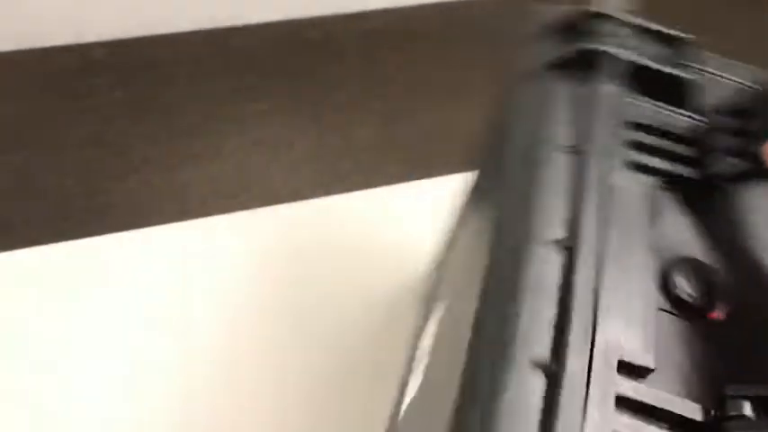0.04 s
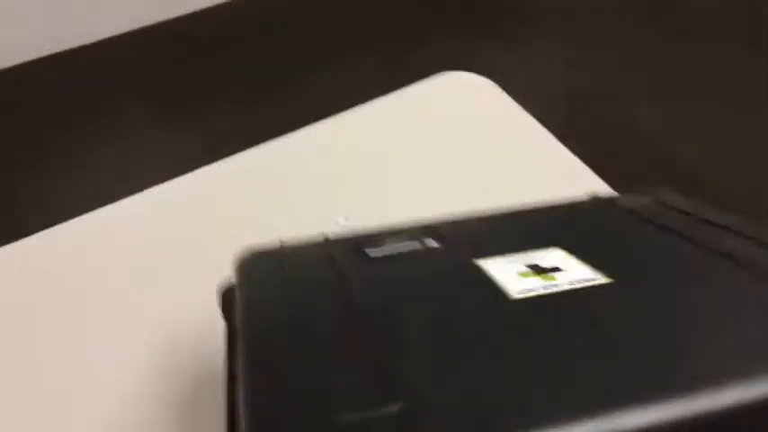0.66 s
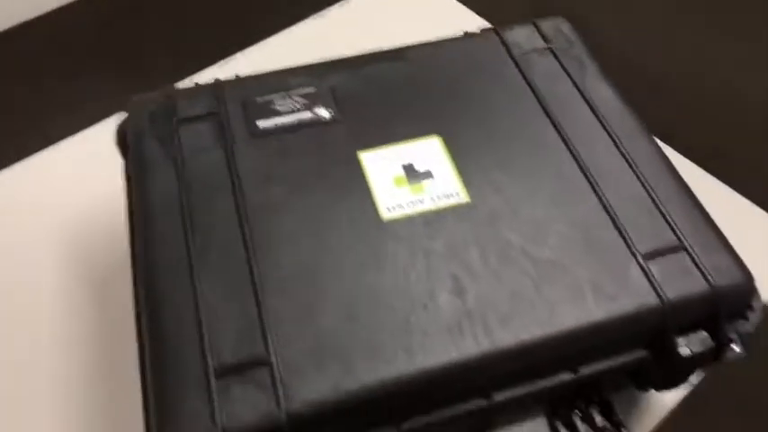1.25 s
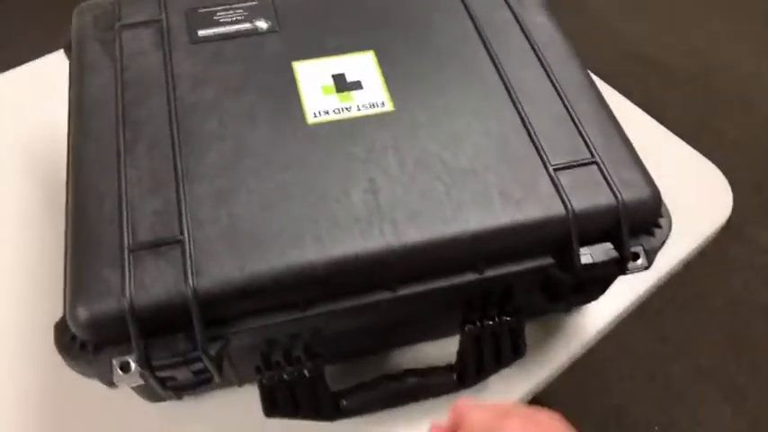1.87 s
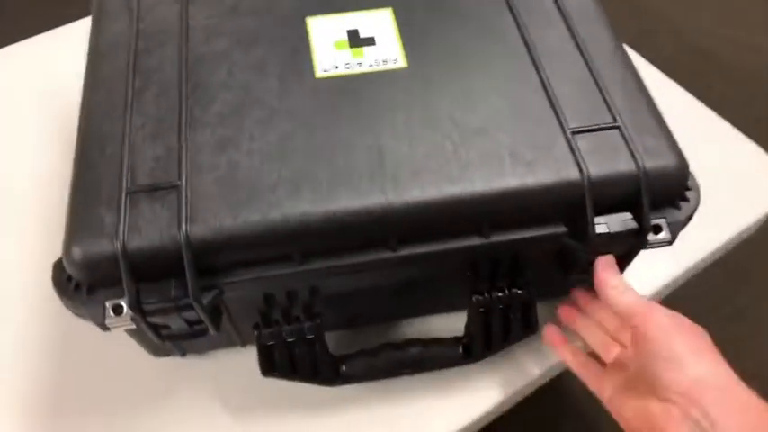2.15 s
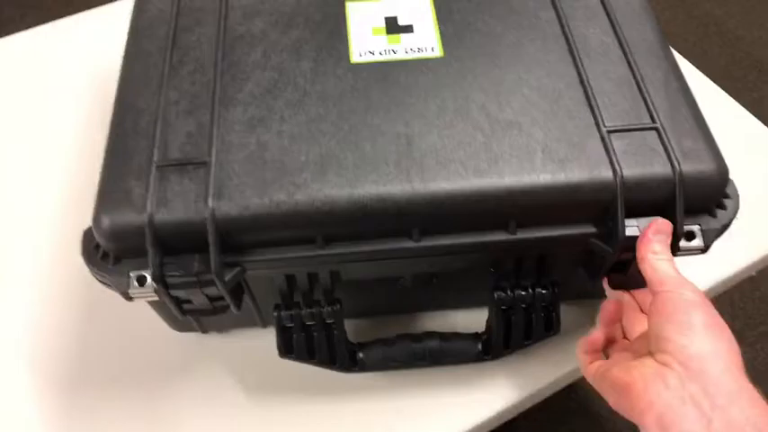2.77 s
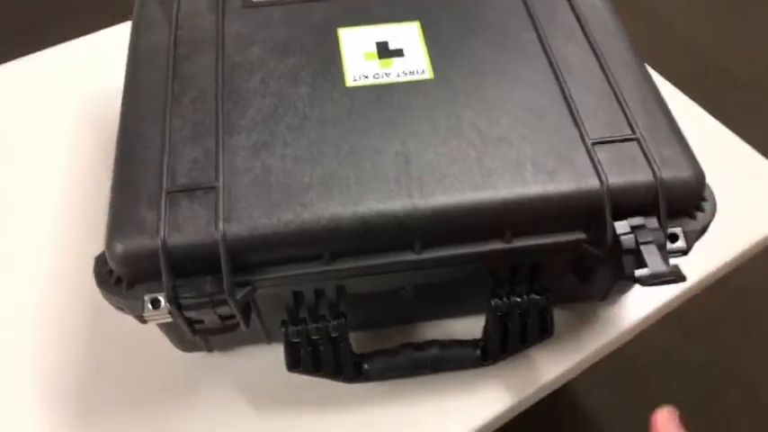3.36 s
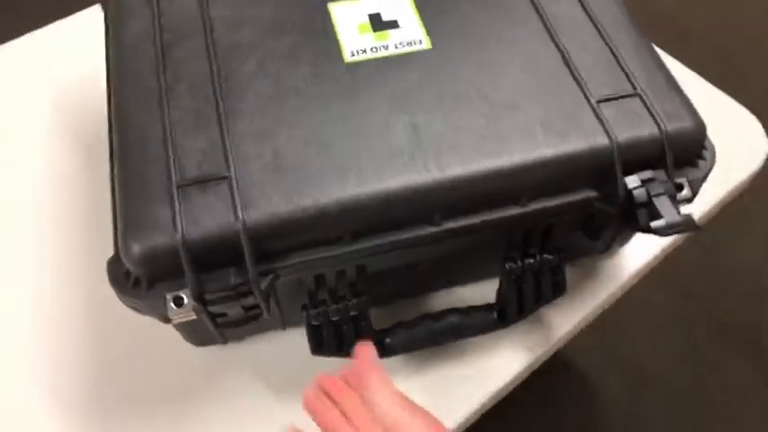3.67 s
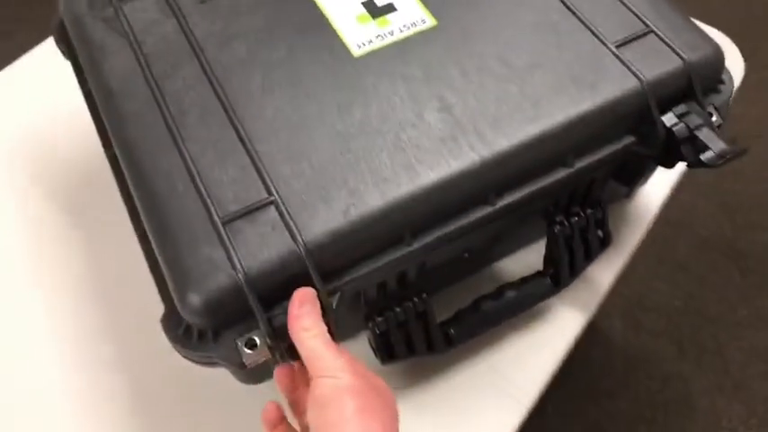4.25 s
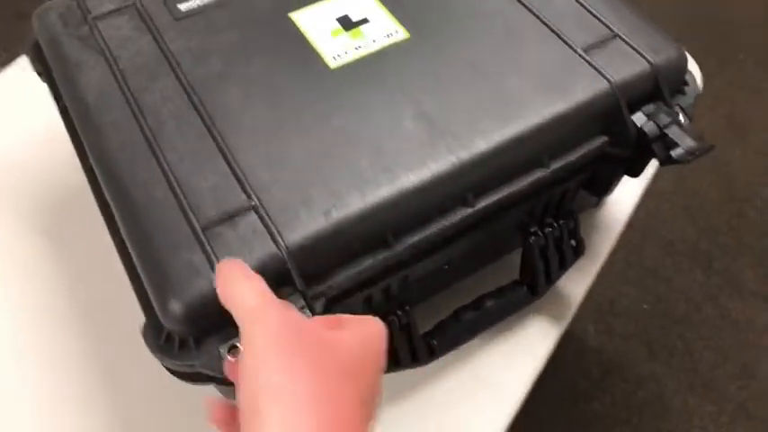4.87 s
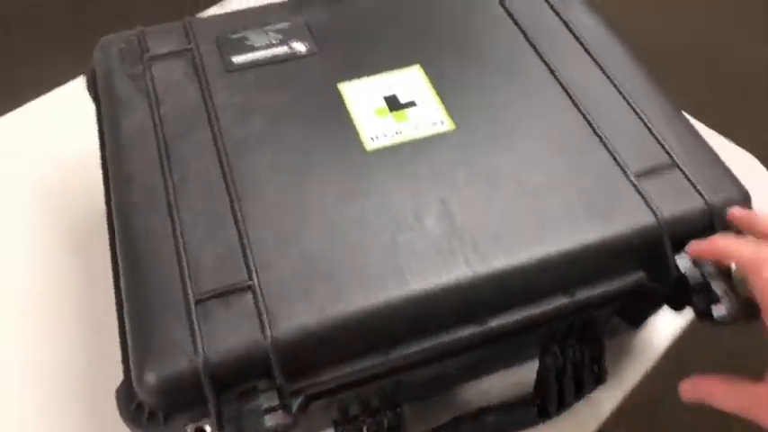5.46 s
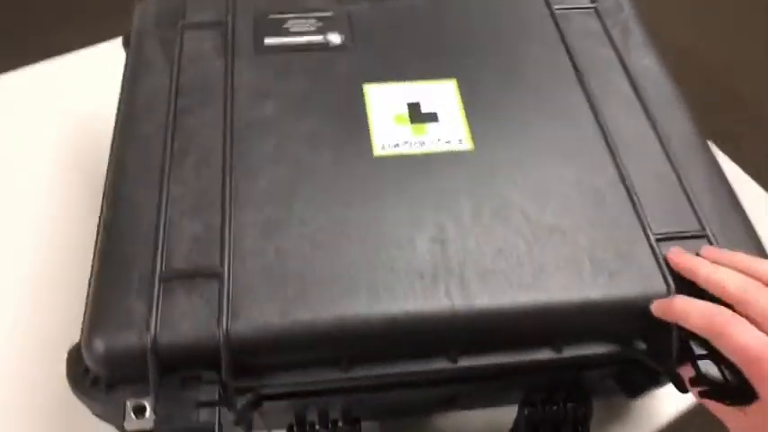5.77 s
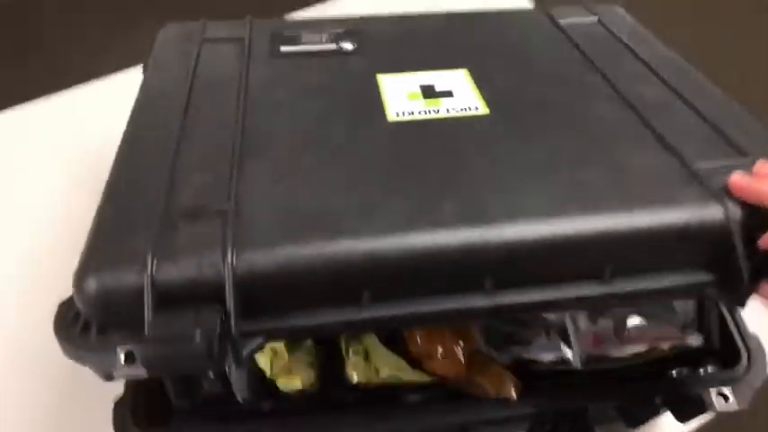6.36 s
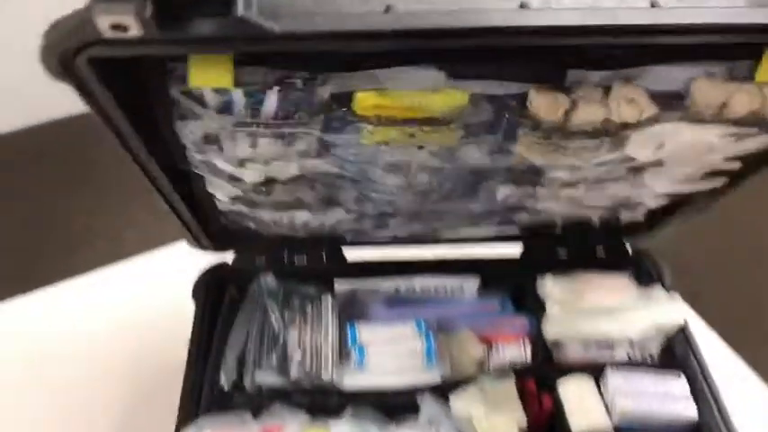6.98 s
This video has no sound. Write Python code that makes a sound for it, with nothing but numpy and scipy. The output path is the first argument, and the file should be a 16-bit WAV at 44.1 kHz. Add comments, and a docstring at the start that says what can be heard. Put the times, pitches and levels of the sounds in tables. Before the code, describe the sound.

A hard plastic case scrapes round on a table and thumps flat, then two latches snap open and the lid lifts.

```python
"""Plastic case, dragged and unlatched

A hard case scrapes round on a table and drops flat; two latches are prised open and the lid lifts.
Each blow is a short crack that rings the struck part and, if heavy, the hollow shell. Stick-slip grains
make the scraping and packets rustle inside. Heard at arm's reach in a carpeted room with humming vents."""
import sys
import numpy as np
from scipy import signal
from scipy.fft import rfft, irfft
from scipy.io import wavfile
from scipy.ndimage import uniform_filter1d

SR = 44100
rng = np.random.default_rng(int(sys.argv[2]) if len(sys.argv) > 2 else 0)


def unload_wav(signal):
    """Save mono or channel-first audio to the path in sys.argv[1] as 16-bit WAV at rate SR, clipped to [-1, 1]."""
    wavfile.write(
        sys.argv[1],
        SR,
        np.round(np.clip(np.atleast_2d(signal).T, -1, 1) * 32767).astype(np.int16),
    )


N = 309582
T = np.arange(N) / SR
BLOW_T = T[:SR // 8]  # time axis of one short hit
TEN_MS = np.sqrt(SR / 100)  # gives a unit-energy hit the energy of 10 ms at rms 1
TOP_HZ = 15400


def undb(db):
    """Decibels to gain."""
    return 10 ** (np.asarray(db) / 20)


def unit(x):
    """Scale to an energy of 1."""
    return x / np.sqrt(np.sum(x ** 2) + 1e-18)


def steady(x):
    """Scale to an rms of 1."""
    return x / np.std(x)


def fader(rows):
    """Gain along a (time, dB) curve, silent outside it."""
    times, levels_db = np.transpose(rows)
    return undb(np.interp(T, times, levels_db, left=-200, right=-200))


def on_log(hz, rows, column=1):
    """Read a column of a table on a log-frequency axis."""
    rows = np.array(rows)
    return np.interp(np.log(np.maximum(hz, 1)), np.log(rows[:, 0]), rows[:, column])


def colour(x, eq):
    """Shape a full-length sound with an EQ curve; rms 1."""
    gain = undb(on_log(np.fft.rfftfreq(N, 1 / SR), eq))
    return steady(irfft(rfft(x) * gain, N))


def band(x, lo, hi, order=2):
    """Causal band-pass."""
    return signal.sosfilt(signal.butter(order, [lo, min(hi, .47 * SR)], "band", fs=SR, output="sos"), x)


def fade(t, t60):
    """Exponential decay, 60 dB down at t60."""
    return np.exp(-np.log(1000) * t / t60)


def ring(modes, t):
    """Damped (Hz, dB, t60) modes, balanced by energy, each in a random polarity."""
    return unit(sum(rng.choice([-1, 1]) * undb(db) * unit(np.sin(2 * np.pi * hz * t) * fade(t, t60))
                    for hz, db, t60 in modes))


def add(out, s, x):
    """Mix x into out from time s."""
    i = max(int(s * SR), 0)
    out[i:i + len(x)] += x[:N - i]


def grains(rate, spread_db):
    """Stick-slip: tiny slips at random moments; a positive spread makes a few stand out."""
    size = undb(spread_db * np.minimum(rng.exponential(size=N), 4))
    slipping = rng.random(N) < rate / SR
    return steady(slipping * rng.choice([-1, 1], N) * size)


def wander(rate):
    """A control signal gliding to a new random value `rate` times a second; rms 1."""
    hold = int(SR / rate)
    steps = np.repeat(rng.standard_normal(N // hold + 1), hold)
    return steady(uniform_filter1d(steps, hold)[:N])


def crack(t60, rise):
    """A burst of micro-contacts, even across frequency; rise is the attack as a share of t60."""
    envelope = fade(BLOW_T, t60) * (1 - np.exp(-BLOW_T / (rise * t60)))
    burst = rng.standard_normal(len(BLOW_T)) * envelope
    for _ in range(3):  # flatten the spectrum while keeping the burst short
        spectrum = rfft(burst)
        contour = np.sqrt(np.abs(uniform_filter1d(np.abs(spectrum) ** 2, size=30)) + 1e-18)
        burst = irfft(spectrum / contour, len(BLOW_T)) * envelope ** .1
    return unit(burst)


# Room tone EQ: (frequency [Hz], level [dB])
AIR_EQ = [(15, -50), (25, -20.5), (66, 0.5), (86, -10.5), (99, -15), (136, -5.5), (331, -18), (567, -21.5),
          (762, -21.5), (919, -22), (1300, -27.5), (2230, -26), (2850, -34), (4150, -35.5), (15500, -44.5)]
# Room tone fader ride: (time [s], level [dB])
AIR_RIDE = [(0, -47), (1.7, -50.5), (2.15, -51.5), (2.62, -49), (2.8, -58.5), (3.25, -47.5), (3.53, -55),
            (4.1, -52), (5.05, -50), (5.3, -57.5), (5.6, -50), (7.02, -54.5)]


def ventilation():
    """Soft air noise over a wavering low drone that swells once."""
    air = colour(rng.standard_normal(N), AIR_EQ) * undb(0.16 * wander(16))
    drone = steady(band(rng.standard_normal(N), 67.6, 76))
    swell_db = 12 * np.exp(-((T - 5.69) / 0.38) ** 2)
    return fader(AIR_RIDE) * air + undb(-59 + swell_db) * drone


# Sliding speed of the case, as a fader ride: (time [s], relative level [dB])
DRAG_RIDE = [(0.0, -24.5), (0.056, -22.5), (0.132, -29), (0.168, -22), (0.534, -30.5), (0.646, -28.5),
             (0.686, -23), (0.712, -23.5), (0.726, -17.5), (0.902, -28.5), (0.924, -31.5), (0.94, -34.5),
             (1.04, -33)]
# EQs of the low, mid and high drag layers: (frequency [Hz], level [dB])
RUMBLE_EQ = [(20, -48), (38, -25.5), (58, 0), (85, -14), (130, 4), (175, -2.5), (240, -12), (400, -69)]
JUDDER_EQ = [(130, -40.5), (220, 0), (280, 2), (340, 2), (430, -14), (600, -12), (1200, -65)]
SCRAPE_EQ = [(240, -32), (400, 0), (558, -6.5), (804, -2.5), (880, -4.5), (1450, -10), (2320, -19.5),
             (3240, -14.5), (3890, -28.5), (4390, -25.5), (7470, -43.5), (8960, -38), (15000, -72.5)]


def dragging():
    """Feet slip over the table: slow slips rumble the shell, faster ones judder walls, fine ones scrape."""
    speed = fader(DRAG_RIDE) / fader(DRAG_RIDE).max()
    on_edge = np.interp(T, [0.42, 0.52], [1, 0])  # tipped on its edge, the case scrapes harder
    rumble = colour(grains(rate=500, spread_db=0.5), RUMBLE_EQ) * speed
    judder = colour(grains(rate=300, spread_db=1.5), JUDDER_EQ) * speed ** 1.33
    scrape = colour(grains(rate=2300, spread_db=-2 / 2), SCRAPE_EQ) * speed ** 1.4
    return undb(-20.5) * rumble + undb(-22.5) * judder + undb(-29 + 4.5 * on_edge) * scrape


# The struck part bends like a short bar. Its partials: (multiple of the ring pitch [ratio])
BAR_RATIOS = [1, 2.756, 5.404]
# Voicing of those partials: (level [dB], share of the ring time [ratio])
BAR_VOICING = [(8.5, 1), (-9.5, 0.56), (-9, 0.81)]
# Ring of the stiff latch and rim: (frequency [Hz], level [dB], t60 [s])
RIM_MODES = [(1220, -4.5, 0.032), (1474, 1.5, 0.0089), (1933, -4.5, 0.018), (2670, -11, 0.0058),
             (2990, -4.5, 0.011), (3440, -6, 0.01), (5900, -7, .011), (7000, -11.5, 0.0042)]


def blow(knock_db, clack_db, snap_db, ring_hz, ring_db, ring_t60, t60, rise, rim_db, soft_hz, hard_hz):
    """A crack rings the struck part and the rim, mixed as low knock, mid clack and high snap."""
    force = crack(t60, rise)
    attack = 1 - np.exp(-BLOW_T / (rise * t60))
    bar = [(ring_hz * ratio, db, ring_t60 * share)
           for ratio, (db, share) in zip(BAR_RATIOS, BAR_VOICING) if ring_hz * ratio < TOP_HZ]
    part = undb(ring_db) * ring(bar, BLOW_T) * attack
    rim = undb(rim_db) * ring(RIM_MODES, BLOW_T) * attack
    soft = unit(band(force, 390, soft_hz, order=1)) + part + rim  # plastic gives, rounding the treble
    hard = unit(band(force, 2000, hard_hz, order=1)) + undb(-1.5) * part + rim
    knock = undb(knock_db) * unit(band(soft, 430, 900, order=3))
    clack = undb(clack_db) * unit(band(soft, 900, 4800, order=3))
    snap = undb(snap_db) * unit(band(hard, 4800, 18000, order=3))
    return (knock + clack + snap) * TEN_MS


# Boom of the hollow shell on the table: (frequency [Hz], level [dB], t60 [s])
SHELL_MODES = [(63, -4.5, 0.51), (76.5, -5, 0.46), (105, -7, .4), (115.6, -2, 0.44), (131, 0, 0.5),
               (167, 2, 0.69), (203.2, 1, 0.2), (234, -2.5, 0.073), (285.2, 1, .15), (315.4, -0.5, 0.18),
               (360, -7.5, 0.089), (416.2, -2, 0.5), (493, -8.5, 0.049), (530, -3.5, 0.085),
               (588, 1.5, 0.14), (633, -1.5, 0.11), (705, -3.5, 0.075), (775, -4.5, 0.072),
               (957, -6.5, 0.15)]


def heavy_blows(rows, ring_cycles, flex_hz, flex_cycles, flex_lag_s, boom_db, hollow_db, rim_db,
                rise, soft_hz, hard_hz):
    """Blows hard enough to flex the walls and set the hollow shell booming."""
    out = np.zeros(N)
    for s, clack, knock, thump, snap, hz, ring_db, *_ in rows:
        t60 = ring_cycles / hz
        weight_db = thump - clack  # a weightier blow rings the rim less and flexes the walls more slowly
        thump_hz = flex_hz * 2 ** (-weight_db / 15)
        add(out, s, blow(knock, clack, snap, hz, ring_db, t60, t60, rise,
                         rim_db - 1.3 * weight_db, soft_hz, hard_hz))
        flex = ring([(thump_hz, 0, flex_cycles / thump_hz)], BLOW_T)
        add(out, s + flex_lag_s, undb(thump) * unit(band(flex, thump_hz / 2, 400)) * TEN_MS)
        # shell modes near the flexing rate take most of the push
        low_modes = [(f, db - 1.9 * abs(np.log2(f / thump_hz)), decay)
                     for f, db, decay in SHELL_MODES if f < 430]
        high_modes = [mode for mode in SHELL_MODES if mode[0] >= 430]
        panel_db = (knock + thump) / 2  # the panels need both a sharp and a heavy blow
        boom = undb(thump + boom_db) * ring(low_modes, T[:SR])
        hollow = undb(panel_db + hollow_db) * ring(high_modes, T[:SR])
        add(out, s + 0.0018, (boom + hollow) * TEN_MS)
    return out


# Hits on the case body:
# (time [s], clack [dB], knock [dB], thump [dB], snap [dB], ring pitch [Hz], ring level [dB])
CASE_HITS = [(.019, -27, -29, -32, -46, 1350, 1), (.038, -29.5, -30.5, -32.5, -48, 1110, -5),
             (1.063, -25, -29, -32, -40, 2700, -9.5), (1.066, -13, -22.5, -11, -47, 1664, -0.5),
             (1.089, -34, -43, -20, -47, 1110, -13), (3.135, -52.5, -47, -35, -44, 910, -13.5),
             (5.5705, -40.5, -63, -49, -69, 1125, 14), (5.584, -44, -60, -61, -68, 1170, 20)]


def case_knocks():
    """The case rocks, lands and is rapped by fingers: dark hits with plenty of boom."""
    return heavy_blows(CASE_HITS, ring_cycles=29, flex_hz=149, flex_cycles=2.4, flex_lag_s=0.00077,
                       boom_db=2.5, hollow_db=-6, rim_db=-0.5, rise=0.024, soft_hz=1680, hard_hz=3950)


def friction_note(hz, flutter_db):
    """Regular slips fuse into a tone that swells and dies; pitch and flutter are given per sample."""
    tone = np.sin(2 * np.pi * np.cumsum(hz) / SR)
    return steady(tone * undb(flutter_db)) * signal.windows.hann(len(hz))


# Groans in the drag: (time [s], length [s], level [dB], pitch [Hz])
FOOT_GROANS = [(0.153, 0.098, -27, 298.8), (0.669, .12, -23, 339.4)]


def groans():
    """Where the drag is fastest the slips lock onto a wall resonance, unsteady in pitch and strength."""
    out = np.zeros(N)
    for s, length, db, hz in FOOT_GROANS:
        n = int(length * SR)
        pitch = hz * (1 + 0.037 * wander(83)[:n])
        add(out, s, undb(db) * friction_note(pitch, flutter_db=-2.5 * wander(97)[:n]))
    return out


def pings(rows, t60, rise_s):
    """Short resonances at the point of contact, from (time, Hz, dB) rows."""
    out = np.zeros(N)
    attack = 1 - np.exp(-BLOW_T / rise_s)
    for s, hz, db in rows:
        add(out, s, undb(db) * unit(ring([(hz, 0, t60)], BLOW_T) * attack) * TEN_MS)
    return out


# Nail and edge ticks: (time [s], clack [dB], snap [dB], ring pitch [Hz], ring level [dB],
# overtone pitch [Hz], overtone level [dB])
NAIL_TICKS = [(.371, -41, -54.5, 2360, 0, 6000, -59), (.4535, -29, -39, 2000, -4.5, 3100, -31),
              (.456, -35, -46.5, 2600, 6, 3700, -39), (2.2037, -35, -50, 1700, 1.5, 3100, -42.5),
              (2.389, -32, -44, 1450, -5.5, 3100, -34), (2.3915, -32.5, -42, 750, 2.5, 4100, -54.5),
              (2.4018, -30, -56.5, 1420, 3.5, 3900, -42), (2.5319, -38.5, -51.5, 1400, -5, 3115, -41),
              (2.534, -40.5, -54, 760, 0, 3780, -46), (4.122, -44, -63.5, 1250, -1, 3800, -50),
              (4.2032, -40, -55, 1200, 3, 3050, -45), (4.3302, -46, -70, 1290, 2.5, 3000, -54.5),
              (4.333, -51, -67, 900, 2, 1500, -51.5), (4.353, -48, -61.5, 1000, 0, 5500, -57),
              (5.678, -48, -63, 3300, 3, 6000, -65), (5.732, -45.5, -61, 1210, 3, 1700, -51)]


def nail_ticks():
    """Fingernails and plastic edges catch, ringing only the small parts for a few cycles."""
    out = np.zeros(N)
    for s, clack, snap, hz, ring_db, *_ in NAIL_TICKS:
        add(out, s, blow(clack - 7, clack, snap, hz, ring_db, ring_t60=13 / hz, t60=0.013,
                         rise=0.018, rim_db=-11.5, soft_hz=2500, hard_hz=7420))
    overtones = [(s, hz, db) for s, *_, hz, db in NAIL_TICKS]
    return out + pings(overtones, t60=0.011, rise_s=0.00033)


# EQ of the shaken contents: (frequency [Hz], level [dB])
RATTLE_EQ = [(240, -23.5), (400, -4), (800, -6.5), (1500, -7), (2400, -14), (4000, -20.5), (6500, -30.5),
             (9000, -37.5), (15000, -54.5)]


def jolted_contents(drop_s):
    """Packed supplies rattle and their wrappers crackle as the case lands."""
    age = np.maximum(T - drop_s, 0)
    rattle = colour(grains(rate=1700, spread_db=-2), RATTLE_EQ) * fade(age, t60=0.47)
    crinkle = steady(band(grains(rate=9200, spread_db=4), 5000, 15000)) * fade(age, t60=0.21)
    return (undb(-21) * rattle + undb(-52) * crinkle) * (T > drop_s)


# Dull bumps on the case: (time [s], wall level [dB], wall pitch [Hz], panel level [dB])
SOFT_BUMPS = [(1.557, -37.5, 147, -35.5), (2.359, -39, 242, -62.5), (3.025, -44, 238, -45),
              (4.155, -43, 297, -60), (5.808, -32, 330, -32.5), (6.068, -45, 277, -59),
              (6.221, -45.5, 286, -54), (6.902, -45.5, 266, -49)]
# Ring of a side panel: (frequency [Hz], level [dB], t60 [s])
PANEL_MODES = [(644, 0, 0.079), (1410, 0.5, .055), (1720, -5, 0.043), (2090, -5, 0.07)]


def bumps():
    """A soft contact flexes a wall and rings a panel, with no treble."""
    out = np.zeros(N)
    for s, wall_db, wall_hz, panel_db in SOFT_BUMPS:
        flex = ring([(wall_hz, 0, 0.027)], BLOW_T)
        wall = unit(band(flex, wall_hz / 2, wall_hz * 2))
        push = undb(8.5) * crack(t60=0.045, rise=0.076)
        panel = unit(band(ring(PANEL_MODES, BLOW_T) + push, 300, 2260, order=8))
        add(out, s, (undb(wall_db) * wall + undb(panel_db) * panel) * TEN_MS)
    return out


# Fingers sliding and plastic straining: (time [s], length [s], level [dB], centre [Hz])
FINGER_RUBS = [(1.78, 0.11, -49, 2290), (1.786, .09, -57.5, 6530), (2.198, 0.015, -38.5, 1900),
               (2.264, 0.12, -38.5, 1740), (2.27, 0.044, -38, 710), (2.314, 0.042, -33.5, 820),
               (2.306, 0.077, -45.5, 4800), (3.236, 0.23, -62, 1720), (3.554, 0.23, -64.5, 1900),
               (3.835, 0.0054, -29, 2430), (3.835, .006, -42, 7500), (4.061, 0.03, -34.5, 1160),
               (4.062, 0.028, -46.5, 4190), (4.101, 0.028, -49.5, 2180), (4.117, .014, -46.5, 2600),
               (4.115, 0.31, -55, 840), (4.26, 0.068, -57, 1600), (4.506, .006, -53, 8500),
               (4.513, 0.023, -45.5, 1620), (4.808, 0.0247, -31.5, 1050), (5.391, 0.038, -60, 2230),
               (5.58, 0.24, -59.5, 1440)]


def finger_rubs():
    """Short swells of skin slipping over the textured plastic."""
    out, slips = np.zeros(N), grains(rate=11000, spread_db=6)
    for s, length, db, hz in FINGER_RUBS:
        swell = signal.windows.tukey(int(length * SR), .5)
        rub = band(slips[int(s * SR):][:len(swell)], hz / 2, hz * 1.53, order=3)
        add(out, s, undb(db) * steady(rub) * swell)
    return out


# Latch and lid hits: (time [s], clack [dB], knock [dB], thump [dB], snap [dB], ring pitch [Hz],
# ring level [dB], pings of the nearby panel, lever and hinge pin as [(pitch [Hz], level [dB])])
LATCH_HITS = [(2.2165, -17, -31.5, -35.5, -27, 1420, -2, [(640, -27), (1480, -20), (3310, -31),
              (3920, -20.5)]), (2.8965, -16.5, -15.5, -13.5, -28.5, 610, -3, [(587, -18.5), (2340, -27.5),
              (3050, -23), (3750, -35), (5950, -32)]),
              (3.0175, -24.5, -31, -31, -43, 1320, -15, [(1300, -25), (2900, -37), (6030, -54)]),
              (3.843, -18.5, -24, -32.5, -31.5, 1100, -8, [(1140, -18.5), (1910, -19), (3900, -20.5),
              (6020, -32.5), (7450, -32)]), (4.5289, -16, -21, -13, -26.5, 1107, 0.5, [(1100, -23),
              (2700, -31), (5940, -28), (9400, -31)]),
              (4.532, -23.5, -26.5, -20, -24.5, 1480, -6, [(3500, -29), (4300, -29), (6300, -28.5)]),
              (4.798, -31.5, -27, -31, -38.5, 715, 6.5, [(1050, -29), (1900, -35), (4230, -37)]),
              (5.7986, -26, -28.5, -31, -39, 1250, -20, [(1130, -25.5), (1950, -32), (2420, -28),
              (2920, -29.5), (3330, -31.5), (5910, -34.5)])]


def latch_snaps():
    """The latches unhook, fly open and rebound, then the lid lets go: bright, hard hits."""
    return heavy_blows(LATCH_HITS, ring_cycles=11.3, flex_hz=211, flex_cycles=1.3, flex_lag_s=0.002,
                       boom_db=-5.5, hollow_db=-4, rim_db=-10, rise=0.052, soft_hz=2450, hard_hz=13200)


def latch_pings(t60, rise_s):
    """Each latch hit also rings the panel, lever and hinge pin beside it."""
    return pings([(s, hz, db) for s, *_, modes in LATCH_HITS for hz, db in modes], t60, rise_s)


def resonance(hz, spread, t60):
    """A crack heard through one resonance; spread is the ratio of its upper edge to its centre."""
    return unit(band(crack(t60, rise=0.07), hz / spread, hz * spread, order=1))


def clicks(rows, body_spread, body_t60, crisp_spread, crisp_t60):
    """Tiny contacts, each sounding a lower body resonance and a crisp higher one."""
    out = np.zeros(N)
    for s, body_db, body_hz, crisp_db, crisp_hz in rows:
        body = unit(band(resonance(body_hz, body_spread, body_t60), body_hz / 2, body_hz * 2))
        crisp = resonance(crisp_hz, crisp_spread, crisp_t60)
        add(out, s, (undb(body_db) * body + undb(crisp_db) * crisp) * TEN_MS)
    return out


# Loose latch clinks: (time [s], plastic level [dB], plastic pitch [Hz], pin level [dB], pin pitch [Hz])
LATCH_CLINKS = [(3.088, -33.5, 1300, -41, 5740), (4.7773, -37, 2990, -43, 6060),
                (4.7903, -41, 2400, -37.5, 6170), (4.8325, -44, 1450, -33.5, 5960)]


def latch_clinks():
    """An open latch rattles on its pin: a broad plastic click with a narrow ring on top."""
    return clicks(LATCH_CLINKS, body_spread=3.4, body_t60=0.0177, crisp_spread=1.1, crisp_t60=0.011)


# Faint skin squeaks: (time [s], length [s], level [dB], start pitch [Hz], end pitch [Hz])
SKIN_SQUEAKS = [(3.25, .055, -52.5, 2016, 2060), (3.254, 0.031, -49.5, 1223, 1260),
                (3.315, 0.077, -58, 1660, 1600), (3.404, .09, -58.5, 1920, 2170),
                (3.713, 0.054, -56.5, 1850, 2240)]


def squeaks():
    """A fingertip sticks and slips fast enough to make a thin, hoarse, gliding note."""
    out = np.zeros(N)
    for s, length, db, start_hz, end_hz in SKIN_SQUEAKS:
        n = int(length * SR)
        pitch = np.linspace(start_hz, end_hz, n) * (1 + 0.055 * wander(600)[:n])
        add(out, s, undb(db) * friction_note(pitch, flutter_db=3.5 * wander(150)[:n]))
    return out


# Rustle swells under the lid: (time [s], length [s], level [dB])
RUSTLE_SWELLS = [(5.86, 0.11, -47.5), (6.06, 0.4, -54), (6.66, 0.13, -70), (6.833, 0.097, -50)]
# Rustle EQ: (frequency [Hz], level [dB])
RUSTLE_EQ = [(88, -53), (150, -2.5), (172, -5), (308, -4), (490, -19), (1220, -10.5), (2860, -19),
             (5440, -20), (7860, -26.5), (11800, -27.5), (15500, -35)]


def packet_rustle():
    """The seal and packets shift in short, grainy swells as the lid rises."""
    swells = np.zeros(N)
    for s, length, db in RUSTLE_SWELLS:
        add(swells, s, undb(db) * signal.windows.tukey(int(length * SR), .5))
    rustle = colour(grains(rate=2000, spread_db=2.5), RUSTLE_EQ)
    return rustle * undb(2.2 * wander(25)) * swells


# Pops under the lid: (time [s], body level [dB], body pitch [Hz], crisp level [dB], crisp pitch [Hz])
LID_POPS = [(6.0613, -53.5, 2400, -52.5, 5240), (6.108, -45.5, 1248, -46.5, 2300),
            (6.124, -62, 5000, -55, 12500), (6.186, -52, 965, -50, 2050), (6.283, -48, 930, -62, 4000),
            (6.317, -57, 1300, -52, 2250), (6.356, -62, 950, -72, 4500), (6.375, -61, 3000, -61, 7000),
            (6.4733, -57, 3000, -54, 5500), (6.484, -60, 6800, -60, 10000), (6.5835, -45, 1780, -49, 5650),
            (6.5845, -49, 3100, -60, 6450), (6.602, -55, 1020, -70, 1660), (6.658, -63, 4730, -54, 11200),
            (6.674, -51, 970, -48, 1940), (6.7005, -67, 1900, -51.5, 4660), (6.708, -49.5, 1084, -61, 1750),
            (6.732, -58, 775, -57, 4600), (6.776, -52.5, 640, -61, 4800), (6.842, -50, 1500, -49.5, 5400),
            (6.843, -52, 2900, -52, 11000), (6.901, -47, 1010, -52, 4300), (6.931, -57, 4770, -50.5, 11400)]


def lid_pops(lift_s, faint_count=7, crisp_ratio=5.2):
    """The seal and packets pop loose, with fainter pops scattered at random once the lid is rising."""
    faint = []
    for _ in range(faint_count):
        s, db = rng.uniform(lift_s, T[-1]), rng.normal(-58.5, 2)
        hz = min(1500 * 2 ** rng.normal(0, 0.96), TOP_HZ / crisp_ratio)
        faint.append((s, db, hz, db, hz * crisp_ratio))
    return clicks(LID_POPS + faint, body_spread=1.11, body_t60=0.012, crisp_spread=1.14, crisp_t60=0.01)


# Reverb of the carpeted room: (frequency [Hz], level [dB], t60 [s])
ROOM_REVERB = [(59.8, 2.5, 1), (202, -6, 1), (590, -6, 0.51), (1450, -6.5, 0.94), (2700, -7, 0.57),
               (4080, -8.5, 0.92), (7700, -6.5, 0.25), (15000, -11, 0.28)]


def room(send, early_db, early_t60, gap_s):
    """Table, floor and walls: early reflections, then a diffuse tail whose treble dies first."""
    t = T[:SR]
    noise, hz = rfft(rng.standard_normal(SR)), np.fft.rfftfreq(SR, 1 / SR)
    early = undb(early_db) * fade(t, early_t60)
    onset = np.clip(t / gap_s - .5, 0, 1)
    edges = np.geomspace(30, 20000, 20)
    impulse = 0
    for lo, hi in zip(edges, edges[1:]):
        centre = np.sqrt(lo * hi)
        tail = fade(t, on_log(centre, ROOM_REVERB, column=2))
        band_noise = irfft(noise * ((hz >= lo) & (hz < hi)), SR)
        gain = undb(on_log(centre, ROOM_REVERB)) * np.sqrt(2 * (hi - lo) / SR)
        impulse = impulse + gain * unit(band_noise * (early + tail) * onset)
    return signal.fftconvolve(send, impulse)[:N]


def scene():
    """The handling sounds, their reverb and the room tone, in mono."""
    moving = dragging() + case_knocks() + groans() + jolted_contents(drop_s=1.07) + bumps()
    opening = finger_rubs() + latch_snaps() + squeaks() + packet_rustle() + lid_pops(lift_s=6.05)
    case = moving + opening
    front = nail_ticks() + latch_clinks()  # these face the listener, so they sound drier
    levers = latch_pings(t60=0.015, rise_s=0.001)
    # heard from all round the room, the lever resonances blur into broad humps
    blurred_levers = latch_pings(t60=0.002, rise_s=0.00033)
    send = case + undb(-2) * front + undb(-6) * blurred_levers
    reverb = room(send, early_db=7.5, early_t60=0.32, gap_s=0.0051)
    return (case + front + levers + reverb + ventilation())[None]


def record(dry):
    """Soft-clip the peaks near full scale, then cut the top steeply."""
    rounded = dry / (1 + dry ** 6) ** (1 / 6)
    return signal.sosfilt(signal.ellip(8, .2, 70, TOP_HZ, fs=SR, output="sos"), rounded)


dry = scene()
out = record(dry)
unload_wav(out)
```